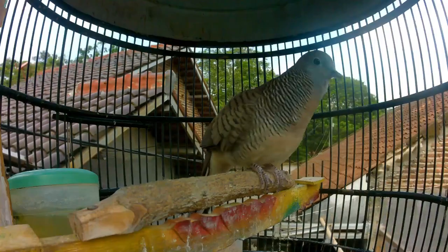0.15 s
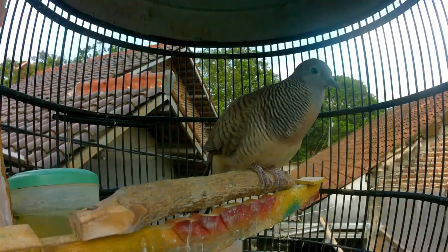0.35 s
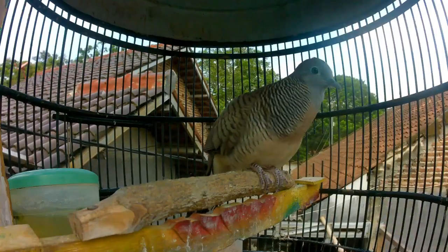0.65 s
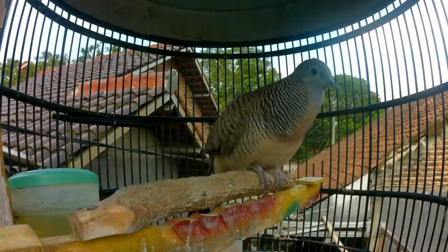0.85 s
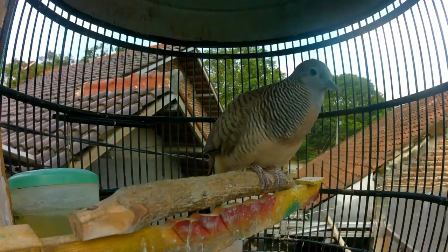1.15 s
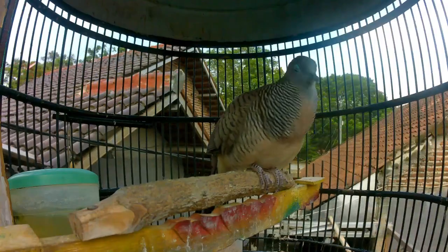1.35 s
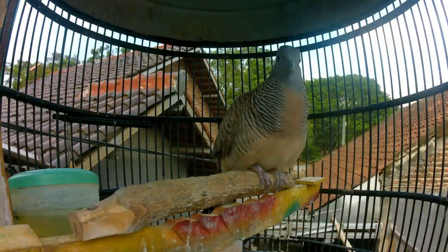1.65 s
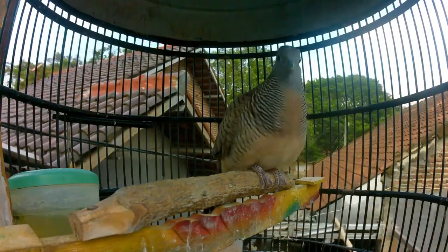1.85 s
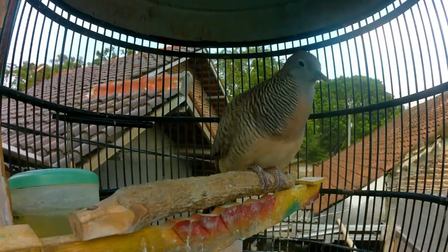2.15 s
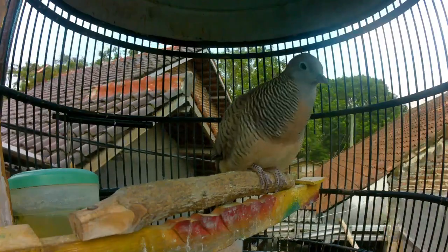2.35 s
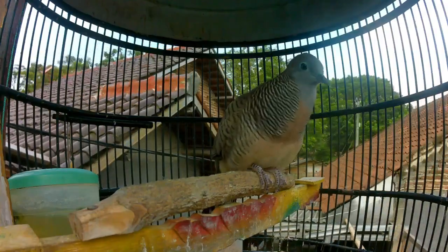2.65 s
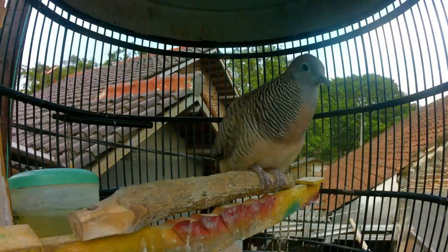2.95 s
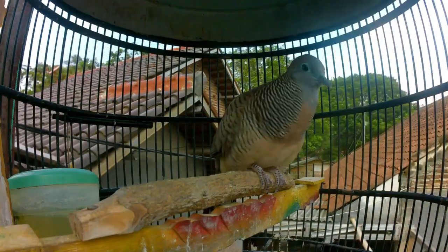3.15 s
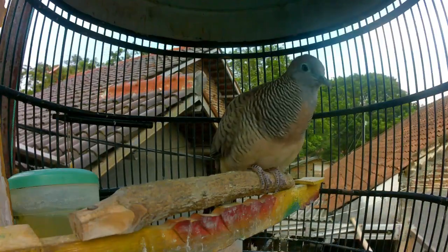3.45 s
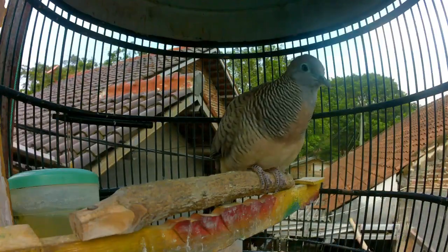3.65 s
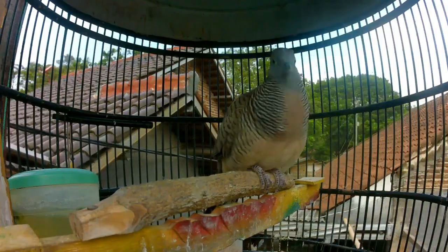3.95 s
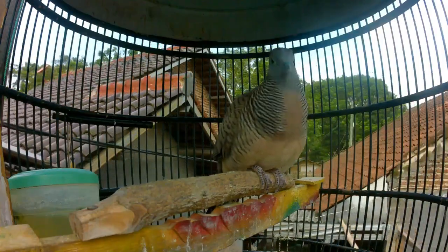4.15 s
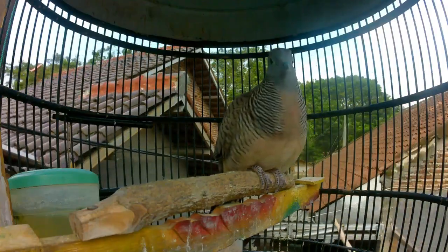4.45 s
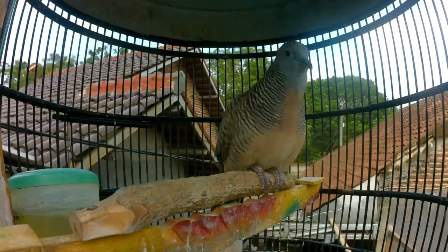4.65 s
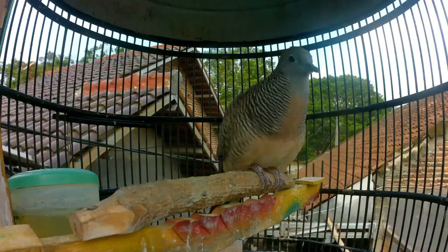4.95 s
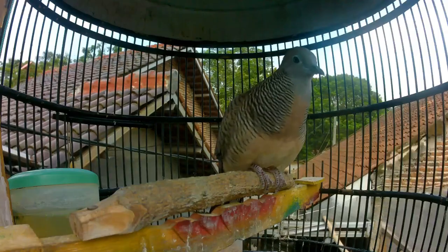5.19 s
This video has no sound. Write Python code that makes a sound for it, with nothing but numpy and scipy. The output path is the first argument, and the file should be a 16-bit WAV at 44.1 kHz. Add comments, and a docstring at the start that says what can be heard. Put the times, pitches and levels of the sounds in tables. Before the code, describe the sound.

A small dove perched in a cage is heard close by, outdoors among houses. Faint mains hum, a thin distant motor whine and a soft bass-heavy rush run steadily throughout. At about 0.2 seconds a tiny throaty puff leads into a warbled coo, then four quick clipped notes from 0.4 to 0.65, and two longer coos near 0.74 and 0.97. The bird rests until about 2.15, when a second warbled opener begins, followed by four short notes and two longer, spaced coos ending near 3.1. Another long pause leaves only the background. A third phrase starts around 4.9: warble, three rapid notes and a slightly longer coo near 5.3, where the sound ends. Each coo is round, almost a pure whistle around 1 kilohertz, gliding up, breaking with a small catch and leaping higher into a brief arched hold, with slight breathiness and short, diffuse echoes.

```python
"""Caged zebra dove, three phrases

Three staccato phrases close by, outdoors among rooftops; a long warbled coo opens each.
Each coo: soft puff, upward glide into the inflated throat's resonance, leap, arched or warbled hold.
The voice is a near sine through the throat, plus weak overtones and hiss; short noise echoes surround it.
Behind: mains hum and the thin whine of a distant motor (sines, narrow noise), soft neighbourhood rush (noise)."""
import sys
import numpy as np
from scipy import signal
from scipy.fft import rfft, irfft
from scipy.io import wavfile
from scipy.ndimage import uniform_filter1d

SR = 44100
rng = np.random.default_rng(int(sys.argv[2]) if len(sys.argv) > 2 else 0)


def output_pcm(signal):
    """Save a mono or channel-first signal as 16-bit PCM at the path in sys.argv[1].

    Samples are clipped to [-1, 1] before scaling.
    """
    pcm = np.clip(np.atleast_2d(signal).T, -1, 1) * 32767
    wavfile.write(sys.argv[1], SR, np.round(pcm).astype(np.int16))


N = 234682
TIME_S = np.arange(N) / SR

# plain coos: pitch leap t/s, rise before it t/s, hold after it t/s, nominal leap pitch f/Hz, drive level/dB
PLAIN_COOS = [(0.3941, 0.009, .034, 998, -13), (0.4501, 0.011, 0.026, 1023, -13.5),
              (.5405, .013, 0.03, 1030, -11.5), (.634, 0.014, 0.037, 1032, -11.5),
              (0.741, .017, 0.096, 998, -11.5), (0.9724, 0.024, 0.091, 986, -13),
              (2.3128, 0.01, 0.037, 1015, -12), (2.4013, 0.012, .028, 1033, -10.5),
              (2.4885, 0.013, .037, 998, -13), (2.5845, 0.015, 0.07, 979, -12.5),
              (2.735, .018, .102, 955, -12.5), (2.9699, 0.022, .102, 959, -11.5),
              (5.0525, .006, 0.038, 1091, -10.5), (5.1031, 0.006, 0.029, 1008, -9.5),
              (5.2043, 0.012, .031, 1052, -9.5), (5.3006, .014, .069, 1006, -10.5)]
# warbled coos opening each phrase: same columns
OPENING_COOS = [(0.2804, 0.042, 0.11, 1040, -11), (2.1999, 0.03, .104, 1003, -12.5),
                (4.948, .033, .101, 1040, -10)]
# windpipe resonances: f/Hz, width/Hz, relative level/dB
WINDPIPE_MODES = [(2624, 240, -43), (3620, 230, -59.5), (5256, 480, -53.5), (6420, 320, -57),
                  (8050, 400, -62)]
# how squarely the beak faces the listener: t/s, overtone level/dB
BEAK_FACING = [(.3, -1.5), (1.0, 1), (2.25, 0.5), (2.8, 2.5), (4.95, -2.5), (5.3, 1)]
# air hiss spectrum in the voice: f/Hz, relative level/dB per Hz
HISS_SPECTRUM = [(200, -2.5), (570, 0), (1000, -16.5), (1800, -0.5), (2600, -18.5), (3500, -33),
                 (7000, -25.5), (15000, -48)]
# hum and motor lines: f/Hz, nominal rms level/dB
HUM_LINES = [(100, -59), (290, -68), (386.5, -74.5), (1522, -67), (2162, -82), (2350, -82), (2747, -82),
             (5249, -88.5)]
# noisy motor whine: f/Hz, width/Hz, rms level/dB
WHINE_BANDS = [(1535, 56, -65.5), (2790, 110, -82.5), (4960, 610, -80), (10050, 320, -82)]
# far surroundings: f/Hz, relative level/dB per Hz
AMBIENCE_SPECTRUM = [(12, 5.5), (25, -4), (48, 2.5), (70, -4), (130, -3.5), (230, -3), (400, -11.5),
                     (650, -11), (1100, -15.5), (1600, -22), (2200, -24.5), (3300, -30.5), (7000, -33),
                     (15500, -31.5)]

THROAT_HZ, THROAT_WIDTH_HZ = 966, 117
# rise: scoops up from below, ever more slowly, and swells
SCOOP_HZ, SCOOP_EASE, OVERSHOOT_HZ, ONSET_DB = 400.5, 2.9, 32.75, -15.5
# hold: softer than the rise once its first push of air has ebbed
HOLD_DB, PUSH_DB, PUSH_S = -3.5, 8, 0.013
# brief break at the leap between registers
BREAK_DB, BREAK_S = -14.5, 0.0027
# plain hold: one arch; longer holds come nearer the ceiling; crest is a share of the hold
CEILING_HZ, SHORTFALL_HZ, REACH_S = 1318, 229.3, 0.026
ARCH_CREST, ARCH_BEND_HZ, FADE_S = 0.45, 537.5, 0.017
# warbled hold: ever deeper dips, the last at the end
WARBLE_DIPS = 3
WARBLE_TOP_HZ, WARBLE_DEPTH_HZ, WARBLE_SAG_HZ = 1342, 150.1, 33.98
SETTLE_HZ, SETTLE_S, WARBLE_SWELL_DB, WARBLE_FADE_S = 176.4, 0.008, 2.5, 0.0069
# puffs, timed from the start of a rise; openers add an early one and a stutter
PUFF_LEAD_S, PUFF_DB = 0.0054, -35
EARLY_LEAD_S, EARLY_DB = 0.038, -34
STUTTER_S, STUTTER_DB = 0.0045, -25.5

YARD_T60_S = 0.47
AMBIENCE_DB = -53
CUTOFF_HZ = 15800


def dove(jitter=0.0057, shimmer_db=2.0, flutter_db=3.5, hiss_db=-46, rasp_db=-37, rough=0.72,
         octave_db=-42, slack_octave_db=8, octave_rough=0.54,
         slack_hz=1150, slack_span_hz=330, chest_hz=640, chest_width_hz=200, chest_db=-13):
    """A near sine booms as it meets the throat resonance; weak overtones and hiss pass around it."""
    pitch_hz, strength = syrinx()
    phase = 2 * np.pi * np.cumsum(pitch_hz * (1 + jitter * drift(110))) / SR
    strength = strength * from_db(shimmer_db * drift(110))

    # slack membranes flap unevenly, which thumps in the chest
    slack = np.clip((slack_hz - pitch_hz) / slack_span_hz, 0, 1)
    flapping = slack ** 2 * strength * drift(500) * np.sin(phase)
    tone = throat(strength * np.sin(phase) + rough * flapping)
    chest = resonate(flapping, chest_hz, chest_width_hz)
    thump = from_db(chest_db) * resonate(chest, chest_hz, chest_width_hz)

    # low register: rough octave
    high = uniform_filter1d((pitch_hz > slack_hz) * 1.0, size=130)
    octave_gain = from_db(octave_db + slack_octave_db * slack) * (1 - high)
    octave = octave_gain * (1 + octave_rough * drift(250)) * np.sin(2 * phase)

    # high register: clean overtones coloured by the windpipe
    harmonics = sum(from_db(flutter_db * drift(35)) * np.sin(k * phase) for k in range(2, 7))
    taut = (pitch_hz / np.max(pitch_hz)) ** 2
    buzz = taut * high * strength * harmonics
    overtones = sum(from_db(db) * resonate(buzz, hz, width_hz) for hz, width_hz, db in WINDPIPE_MODES)
    overtones = from_db(along(BEAK_FACING, TIME_S)) * overtones

    hiss = (from_db(hiss_db) + from_db(rasp_db) * slack) * coloured_noise(HISS_SPECTRUM)
    return tone + thump + pulses() + overtones + strength * (octave + hiss)


def syrinx():
    """Pitch and strength of the vibrating membranes: each coo rises, breaks, leaps and holds."""
    pitch_hz, strength = np.full(N, float(THROAT_HZ)), np.zeros(N)
    for coos, hold_shape in ((OPENING_COOS, warble), (PLAIN_COOS, arch)):
        for leap_s, rise_s, hold_s, leap_hz, db in coos:
            span = (TIME_S >= leap_s - rise_s) & (TIME_S < leap_s + hold_s)
            t = TIME_S[span] - leap_s   # negative in the rise
            rise_hz = leap_hz + OVERSHOOT_HZ - SCOOP_HZ * np.exp(-SCOOP_EASE * (1 + t / rise_s))
            swell = from_db(ONSET_DB * (t / rise_s) ** 2)
            hold_hz, hold = hold_shape(np.maximum(t, 0), hold_s)
            hold = hold * from_db(HOLD_DB + PUSH_DB * np.exp(-np.abs(t) / PUSH_S))
            level_db = db + BREAK_DB * np.exp(-(t / BREAK_S) ** 2)
            pitch_hz[span] = np.where(t < 0, rise_hz, hold_hz)
            strength[span] = np.where(t < 0, swell, hold) * from_db(level_db)
    return uniform_filter1d([pitch_hz, strength], size=30)   # the membranes cannot change at once


def arch(t, hold_s):
    """Pitch and strength of a plain hold: a parabola of pitch, then a fade."""
    top_hz = CEILING_HZ - SHORTFALL_HZ * np.exp(-hold_s / REACH_S)
    hz = top_hz - ARCH_BEND_HZ * (t / hold_s - ARCH_CREST) ** 2
    return hz, np.clip((hold_s - t) / FADE_S, 0, 1)


def warble(t, hold_s):
    """Pitch and strength of an opener's hold: both dip together."""
    share = t / hold_s
    dip = share * (1 - np.abs(np.sin(np.pi * WARBLE_DIPS * share)))
    settling_hz = SETTLE_HZ * np.exp(-t / SETTLE_S)
    hz = WARBLE_TOP_HZ - settling_hz - WARBLE_SAG_HZ * share - WARBLE_DEPTH_HZ * dip
    fade = np.clip((hold_s - t) / WARBLE_FADE_S, 0, 1)
    return hz, from_db(WARBLE_SWELL_DB * (share - 2 * dip)) * fade


def throat(x, dip_hz=1110, dip_width_hz=40):
    """The inflated throat has one strong resonance with a narrow dip above it."""
    boom = resonate(x, THROAT_HZ, THROAT_WIDTH_HZ)
    return boom - resonate(boom, dip_hz, dip_width_hz)


def pulses(ring_hz=980, width_hz=150, count=2):
    """Lone soft puffs around the start of a rise set the throat ringing."""
    puffs = np.zeros(N)
    for leap_s, rise_s, *_ in [*OPENING_COOS, *PLAIN_COOS]:
        puffs[round((leap_s - rise_s - PUFF_LEAD_S) * SR)] = from_db(PUFF_DB)
    for leap_s, rise_s, *_ in OPENING_COOS:
        start_s = leap_s - rise_s
        puffs[round((start_s - EARLY_LEAD_S) * SR)] = from_db(EARLY_DB)
        for k in range(count):
            puffs[round((start_s + k * STUTTER_S) * SR)] = from_db(STUTTER_DB)
    soft = signal.sosfilt(signal.butter(4, 1450, fs=SR, output="sos"), puffs)
    return resonate(soft, ring_hz, width_hz) * SR / (2 * np.pi * width_hz)   # undo the narrow-band loss


def yard(x, first_echo_s=0.0052, near_db=-24, near_t60_s=0.066,
         ring_hz=1230, ring_width_hz=90, ring_db=-21, far_db=-25):
    """Quick echoes off the cage roof, a lingering ring of the nook around it, a faint tail from the houses."""
    t = TIME_S[:SR]
    t60_s = np.array([[near_t60_s], [YARD_T60_S], [YARD_T60_S]])
    echoes = rng.standard_normal((3, SR)) * (t > first_echo_s) * from_db(-60 * t / t60_s)
    near, nook, far = echoes / np.linalg.norm(echoes, axis=1, keepdims=True)   # unit energy
    ring = resonate(nook, ring_hz, ring_width_hz)
    response = from_db(near_db) * near + from_db(ring_db) * ring + from_db(far_db) * far
    return signal.fftconvolve(x, response)[:N]


def machinery(wander_hz=0.86, waver_db=1.2):
    """Hum and motor lines that waver a little in level and pitch, and a narrow noisy whine."""
    out = np.zeros(N)
    for hz, db in HUM_LINES:
        gain = from_db(db + waver_db * drift(7.3)) * np.sqrt(2)   # rms to peak
        phase = 2 * np.pi * np.cumsum(hz + wander_hz * drift(3.94)) / SR
        out += gain * np.sin(phase)
    for hz, width_hz, db in WHINE_BANDS:
        out += from_db(db) * rms_one(resonate(rng.standard_normal(N), hz, width_hz))
    return out


def neighbourhood():
    """Soft steady rush: noise weighted towards the bass."""
    return from_db(AMBIENCE_DB) * coloured_noise(AMBIENCE_SPECTRUM)


def from_db(db):
    """Decibels to gain."""
    return 10 ** (np.asarray(db) / 20)


def rms_one(x):
    """Scale to rms 1."""
    return x / np.sqrt(np.mean(x ** 2) + 1e-20)


def along(rows, at):
    """Read a two-column table by straight lines."""
    return np.interp(at, *np.transpose(rows))


def coloured_noise(spectrum):
    """Noise of rms 1 with the given spectrum, interpolated over log frequency."""
    hz, db = np.transpose(spectrum)
    bins_hz = np.maximum(np.arange(N // 2 + 1) * SR / N, 1)
    gain = from_db(np.interp(np.log(bins_hz), np.log(hz), db))
    return rms_one(irfft(rfft(rng.standard_normal(N)) * gain, N))


def drift(rate_hz):
    """Smooth random signal of rms 1: noise rolled off above the rate."""
    bins_hz = np.arange(N // 2 + 1) * SR / N
    return rms_one(irfft(rfft(rng.standard_normal(N)) / (1 + (bins_hz / rate_hz) ** 2), N))


def resonate(x, hz, width_hz):
    """One two-pole resonance with about unit gain at its peak."""
    r = np.exp(-np.pi * width_hz / SR)
    zeros = np.array([1, 0, -1]) * (1 - r * r) / 2
    poles = [1, -2 * r * np.cos(2 * np.pi * hz / SR), r * r]
    return signal.lfilter(zeros, poles, x + 1e-18)


def scene():
    """The dove and its echoes over the background."""
    bird = dove()
    return (bird + yard(bird) + machinery() + neighbourhood())[None]


def record(dry):
    """The converter cuts the top and adds a small constant offset."""
    offset = -0.0119
    low_pass = signal.ellip(10, 0.1, 70, CUTOFF_HZ, fs=SR, output="sos")
    return signal.sosfilt(low_pass, dry) + offset


dry = scene()
out = record(dry)
output_pcm(out)
```